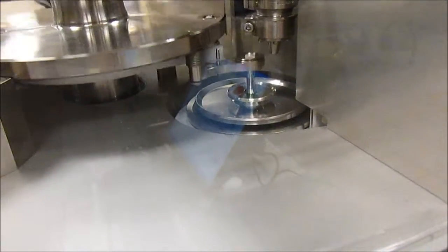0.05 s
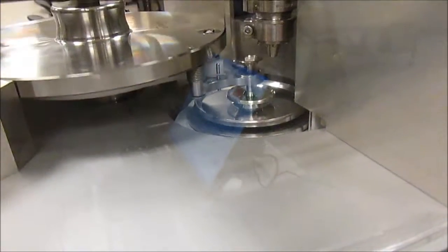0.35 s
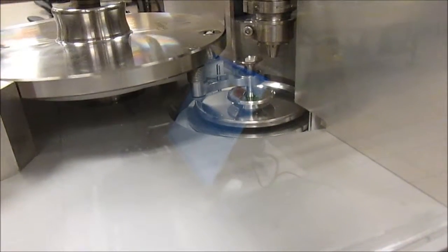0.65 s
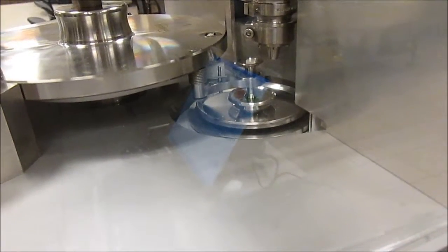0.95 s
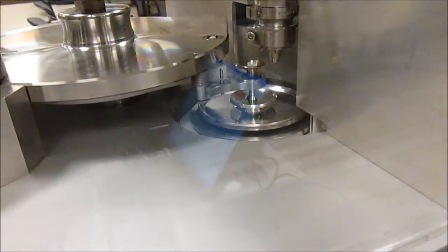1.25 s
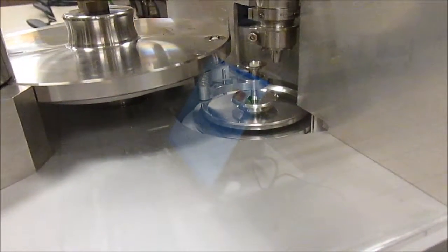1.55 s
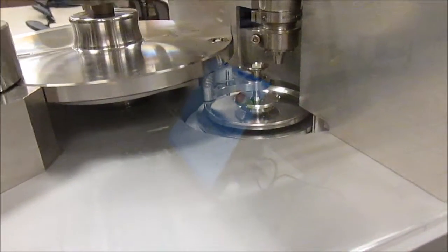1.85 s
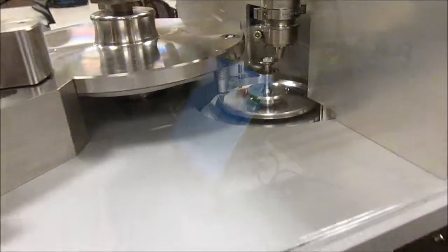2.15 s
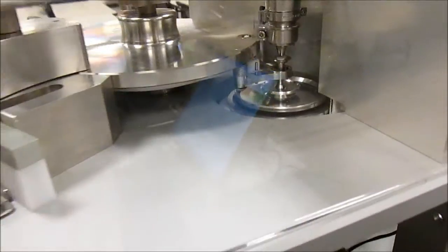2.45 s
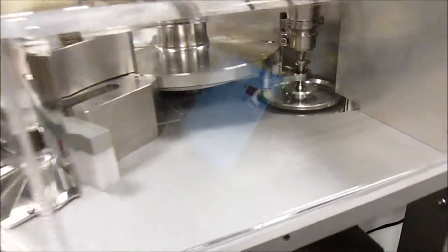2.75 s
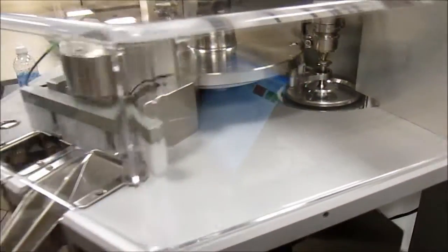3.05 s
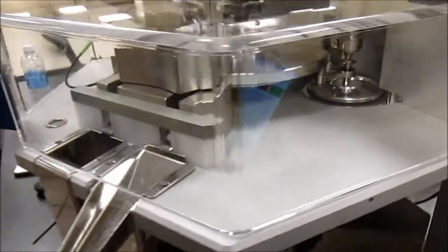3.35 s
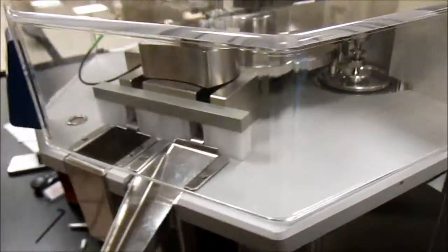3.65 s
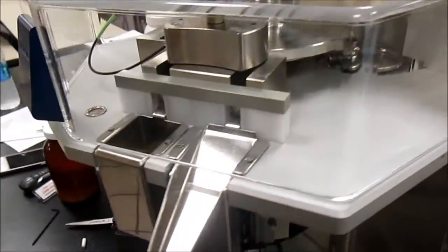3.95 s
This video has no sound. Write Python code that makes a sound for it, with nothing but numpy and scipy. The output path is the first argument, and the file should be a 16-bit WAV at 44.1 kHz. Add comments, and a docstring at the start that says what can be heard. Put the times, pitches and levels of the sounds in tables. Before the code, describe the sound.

Close to a packaging machine in a workroom, a pump drones and air rushes. The air stops, leaving the hum and several sharp metal clacks with short puffs, followed by a rapid, hissy pneumatic rattle.

```python
"""A vacuum pump hums and air hisses through a port, close to a capsule filling machine.
The air is shut off; the pump runs on, its housing ringing and knocking every turn.
Pneumatic slides rasp and clack against steel stops, then a valve fires twenty times a second
in a buzzing rattle. A gain control ducks the hum under every loud blow."""
import sys
import numpy as np
from scipy import signal
from scipy.fft import rfft, irfft
from scipy.io import wavfile

SR = 44100
rng = np.random.default_rng(int(sys.argv[2]) if len(sys.argv) > 2 else 0)


def wrap_up_sound(samples):
    """Save the sound to the file named by the first command line argument, as 16-bit audio."""
    columns = np.atleast_2d(samples).T
    # keep every value between -1 and 1, then stretch to whole-number steps
    tamed = np.clip(columns, -1, 1)
    steps = np.round(tamed * 32767).astype(np.int16)
    wavfile.write(sys.argv[1], SR, steps)


N = 176400
T = np.arange(N) / SR
AGE = np.arange(SR // 2) / SR   # time within one event, s
PUMP_HZ, STROKE_S = 28.17, 1.671   # turn rate, time of one stroke


def from_db(db):
    """Decibels to gain."""
    return 10 ** (np.asarray(db) / 20)


def rms_one(x):
    """Scale to unit power."""
    return x / np.sqrt(np.mean(x ** 2) + 1e-20)


def curve(rows, t=T):
    """Gain along a (s, dB) curve."""
    return from_db(np.interp(t, *np.transpose(rows)))


def pan(db):
    """Left gain up by db, right gain down."""
    return from_db(np.array([[db], [-db]]))


def drift(rate, t=T):
    """Unit Gaussian knots, `rate` per unit of t, joined by lines."""
    knots = rng.standard_normal(size=4000)
    return np.interp(t * rate, np.arange(len(knots)), knots)


def white(size=N):
    """Two independent white noises."""
    return rng.standard_normal((2, size))


def cyclic(period_s, share):
    """Noise with a share of its power repeating every period."""
    repeating = white(len(AGE))[:, (T % period_s * SR).astype(int)]
    return np.sqrt(share) * repeating + np.sqrt(1 - share) * white()


def burst(attack_s, hold_s, t60_s):
    """Envelope: rise, hold, exponential decay."""
    return np.clip(AGE / attack_s, 0, 1) * from_db(-60 * np.maximum(AGE - hold_s, 0) / t60_s)


def smooth(x, seconds):
    """One-pole lag."""
    r = np.exp(-1 / (seconds * SR))
    return signal.lfilter([1 - r], [1, -r], x)


def place(events):
    """Lay (s, sound) pairs on the stereo time line."""
    out = np.zeros((2, N + SR))
    for s, sound in events:
        out[:, int(s * SR):int(s * SR) + len(AGE)] += sound
    return out[:, :N]


def ring(times, hz, t60_s):
    """A damped mode struck at the given times."""
    clicks = np.full(N, 1e-18)
    times = np.asarray(times)
    clicks[(times[(times >= 0) & (times < T[-1])] * SR).astype(int)] = 1
    r, w = from_db(-60 / (t60_s * SR)), 2 * np.pi * hz / SR
    return signal.lfilter([0, np.sin(w)], [1, -2 * r * np.cos(w), r * r], clicks)


def colour(noise, spectrum, resonances=()):
    """Shape two noises by a spectrum, resonances and steel-wall reflections; stereo, rms 1."""
    # Stereo likeness. Each row: frequency in Hz, left-right correlation.
    likeness = [(100, 1), (400, 0.77), (1400, 0.65), (2800, 0.17), (5000, 0.62), (9000, 0.88),
                (15000, 0.78)]
    size, hz = noise.shape[1], np.linspace(1, SR / 2, 4410)

    def along(rows):
        knots_hz, values = np.transpose(rows)
        return np.interp(np.log(hz), np.log(knots_hz), values)

    power = 1 + sum((from_db(db) ** 2 - 1) / (1 + (2 * (hz - centre) / width) ** 2) ** 1.12
                    for centre, width, db in resonances)
    ripple_db = 2 * drift(1 / 44.66, hz) * hz / (hz + 500)   # reflections
    gain = from_db(along(spectrum) + ripple_db) * np.sqrt(np.abs(power))
    alike = along(likeness)
    mid_side_gain = gain * np.sqrt([1 + alike, 1 - alike])
    bins = np.linspace(0, len(hz) - 1, size // 2 + 1).astype(int)
    mid, side = irfft(rfft(noise) * mid_side_gain[:, bins], size)
    return rms_one(np.array([mid + side, mid - side]))


def noise_burst(db, envelope, spectrum, resonances=()):
    """One short event of coloured noise."""
    return from_db(db) * envelope * colour(white(len(AGE)), spectrum, resonances)


def housing_tone(levels_db):
    """A blow each turn rings the pump housing, the ring spread through the turn; rms 1."""
    orders, angle = np.arange(1, len(levels_db) + 1), np.linspace(0, 2 * np.pi, 4096)
    partials = from_db(levels_db)[:, None] * np.exp(1j * np.outer(orders, angle))
    # Minimum phase gives the sharpest attack.
    log_gain = np.log(from_db(np.interp(np.arange(257) / 4, orders, levels_db)))
    phases = rfft(2 * irfft(log_gain)[:256], 512).imag[4 * orders]
    # Even out the envelope, keeping the spectrum.
    flattened = np.exp(1j * np.angle(np.exp(1j * phases) @ partials))
    phases = np.angle(np.fft.fft(flattened)[orders])
    stereo_rad = 0.18 * rng.choice([-1, 1], len(orders)) * np.array([[1], [-1]])
    scatter_rad = 0.18 * rng.normal(size=len(orders))
    cycle = rms_one((np.exp(1j * (phases + scatter_rad + stereo_rad)) @ partials).real)
    turn = (T - STROKE_S + 0.002) * PUMP_HZ % 1   # the blow leads the stroke's peak
    return cycle[:, (turn * (len(angle) - 1)).astype(int)]


def pump():
    """Vacuum pump: hum, knocks and clatter recur every turn."""
    # Hum harmonics, from the first up. Each row: relative dB at the port, relative dB in front.
    harmonics = [(-27, -24), (-27, -29), (-10, -9.5), (-13, -11), (-21, -21), (-4.5, -5.5), (-11, -9.5),
                 (-16.5, -27), (1.5, 1), (-1.5, -6.5), (-13, -8.5), (-10, -7), (-22.5, -25), (-15.5, -13),
                 (-14, -12), (-22, -15.5), (-14, -13)]
    # Knocks. Each row: delay after the stroke in seconds, pitch in Hz, t60 in seconds, level in dB.
    knock_modes = [(.0215, 618, 0.06, -21.5), (.0092, 1200, 0.013, -26.5), (.014, 900, 0.097, -33.5),
                   (0.017, 1590, 0.016, -36)]
    # Clatter. Each row: frequency in Hz, relative density in dB.
    clatter_spectrum = [(300, -6.5), (450, -2), (800, -2.5), (1800, 0), (2300, -2), (2900, -12.5),
                        (6500, -15), (15000, -21.5)]
    # Whole pump. Each row: time in seconds, gain in dB.
    level = [(0, -8), (.15, 1.5), (1.1, 2), (1.2, -2), (2.1, 0.5), (2.8, -1.5), (3.3, -5.5), (4, -0.5)]
    port_db, front_db = np.transpose(harmonics)
    moved = np.interp(T, (2.37, 3.04), [0, 1])   # listening point moves from port to front
    hum_gain = from_db(-24 + 0.7 * drift(9))
    hum = hum_gain * ((1 - moved) * housing_tone(port_db) + moved * housing_tone(front_db))
    turn_s = 1 / PUMP_HZ
    strokes_s = np.arange(STROKE_S % turn_s - turn_s, T[-1], turn_s)
    knocks = sum(from_db(db) * ring(strokes_s + delay, hz, t60) for delay, hz, t60, db in knock_modes)
    clatter = from_db(-32.5) * colour(cyclic(turn_s, share=0.79), clatter_spectrum)
    return curve(level) * (hum * pan(-0.9) + knocks * pan(-2.5) + clatter)


def frame_rumble():
    """Low noise of the vibrating frame."""
    # Rumble. Each row: frequency in Hz, relative density in dB.
    spectrum = [(20, -5), (50, -24), (115, -3), (400, -8.5), (2000, -34)]
    # Each row: time in seconds, level in dB.
    level = [(.4, -30), (1.5, -39.5), (2.4, -39.5), (2.65, -31), (3.1, -42)]
    return curve(level) * colour(white(), spectrum)


def port_hiss():
    """Air rushes through a resonant port until shut off."""
    # Air flow. Each row: time in seconds, gain in dB.
    flow = [(0, -1), (1.09, 1), (1.15, -3), (1.3, -7.5), (1.4, -14), (1.54, -29), (2, -54.5)]
    # Hiss. Each row: frequency in Hz, relative density in dB.
    spectrum = [(100, -5.5), (600, -1), (2300, -3.5), (2900, -13), (5600, -6), (7500, -5.5), (7880, -17),
                (8250, -6), (10200, -1), (12800, -4.5), (15500, -0.5)]
    # Port resonances. Each row: centre in Hz, width in Hz, boost in dB.
    resonances = [(7260, 230, 6), (9330, 103, 14), (10870, 410, 13.5), (11110, 210, 12.5),
                  (12000, 130, 9.5), (14400, 420, 10.5)]
    return from_db(-19 + drift(60.3)) * curve(flow) * colour(white(), spectrum, resonances)


def cylinder_puffs():
    """Short puffs of air let into a resonant cylinder."""
    # Each row: start in seconds, level in dB.
    puffs = [(2.099, -27), (2.47, -30.5), (2.514, -33), (3.09, -19)]
    # Cylinder resonances. Each row: centre in Hz, width in Hz, boost in dB.
    resonances = [(4230, 490, 6.4), (8350, 790, 16), (11100, 1000, 13)]
    spectrum = [(1000, -1), (5000, -6), (15000, -13)]   # Hz, relative dB
    envelope = burst(0.02, 0.025, 0.1)
    return place((s, noise_burst(db, envelope, spectrum, resonances)) for s, db in puffs)


def seal_squeak():
    """A seal squeaks: a brief tone with jittering pitch."""
    # Each row: start in seconds, level in dB, hold in seconds, pitch in Hz.
    squeaks = [(1.37, -27, 0.028, 7250)]
    events = []
    for s, db, hold_s, hz in squeaks:
        phase = 2 * np.pi * np.cumsum(hz + 90 * drift(600, AGE)) / SR
        events.append((s, from_db(db) * burst(0.003, hold_s, 0.066) * np.sin(phase)))
    return place(events)


def stop_rings():
    """Some steel stops ring on unevenly after a blow."""
    # Each row: start in seconds, pitch in Hz, level in dB, t60 in seconds.
    modes = [(1.424, 4190, -39.5, .4), (1.829, 2360, -17.5, .07), (1.828, 7540, -17, .06)]
    return sum(from_db(db + 2 * drift(280)) * ring([s], hz, t60) for s, hz, db, t60 in modes)


def stop_clacks():
    """Blows on the stops: a brief chatter of steel on steel, with a faint tail."""
    # Each row: start in seconds, level in dB, contact in seconds, brightest Hz, t60 in seconds.
    blows = [(0.26, -17, 0.0018, 11000, 0.023), (1.288, -12, 0.0035, 9000, 0.048),
             (1.408, -25.5, .003, 11000, 0.028), (1.4225, -15, 0.0018, 5950, 0.01),
             (1.8202, -4.5, 0.0016, 13100, 0.04), (2.1639, 0, 0.0013, 5500, 0.027),
             (2.3122, -29.5, .002, 10000, 0.042), (2.424, -16, 0.0035, 7600, 0.05),
             (2.559, -19, 0.0045, 6900, 0.098), (3.152, -2, 0.0012, 7500, 0.026)]
    grid_hz, width_oct = np.geomspace(200, 16000, num=24), 0.5
    events = []
    for s, db, contact_s, hz, t60_s in blows:
        hump = from_db(-4) + np.exp(-0.5 * (np.log2(grid_hz / hz) / width_oct) ** 2)
        spectrum = np.column_stack([grid_hz, 20 * np.log10(hump)])
        chatter = burst(0.00022, contact_s, t60_s)
        click = 0.5 * burst(1 / SR, contact_s / 2, contact_s)
        tail = from_db(-21.5) * burst(0.0039, contact_s, 0.2)
        events.append((s, noise_burst(db, chatter + click + tail, spectrum)))
    return place(events)


def slide_rasps():
    """A pneumatic slide rasps on each stroke."""
    # Each row: start in seconds, level in dB, hold in seconds.
    strokes = [(2.134, -13, 0.016), (3.125, -14, 0.014)]
    # Rasp. Each row: frequency in Hz, relative density in dB.
    spectrum = [(300, -10), (850, -3.5), (3200, -2), (4300, -1), (6500, -11), (11000, -6.5), (15500, -22)]
    # Slide resonances. Each row: centre in Hz, width in Hz, boost in dB.
    resonances = [(890, 130, 7), (1870, 80, 10), (2450, 190, 5.2), (4260, 360, 3.6)]
    return place((s, noise_burst(db, burst(0.001, hold_s, 0.14), spectrum, resonances))
                 for s, db, hold_s in strokes)


def frame_thuds():
    """Heavy parts shake the frame."""
    # Each row: start in seconds, level in dB, spectral peak in Hz.
    thuds = [(0.126, -22.5, 271), (0.256, -27.5, 69.6), (2.562, -25.5, 395)]
    envelope = burst(0.0047, 0.0071, 0.18)
    return place((s, noise_burst(db, envelope, [(hz / 4, -20), (hz, 0), (hz * 10, -60)]))
                 for s, db, hz in thuds)


def valve():
    """Evenly timed, lengthening bursts sputter and ring in the valve body and the enclosure."""
    # Bursts, then the enclosure's slower answer. Each row: time in seconds, level in dB.
    jet_level = [(2.85, -2.5), (3.1, -4), (3.35, -8.5), (3.55, -6), (4, -2.5)]
    enclosure_level = [(2.85, -22.5), (3.3, -23), (3.8, -18)]
    # Their spectra. Each row: frequency in Hz, relative density in dB.
    jet_spectrum = [(1500, -24), (3500, -15.5), (5000, -10), (7000, -10.5), (8200, -5.5), (9500, 1),
                    (11200, -2.5), (13200, -1), (14000, -11), (15500, -3)]
    enclosure_spectrum = [(1000, -2), (3000, 0), (3550, -11), (4300, 0), (7000, 0), (15000, -7)]
    # Valve body resonances. Each row: centre in Hz, width in Hz, boost in dB.
    resonances = [(5550, 260, 8), (5830, 210, 7.8), (8650, 250, 9.1), (9060, 200, 7.9), (12430, 330, 9.5),
                  (13230, 220, 5.7)]
    start_s, period_s, sputter_db, sputters_per_s = 2.8525, 0.04999, 1.8, 500
    times = np.arange(start_s, T[-1], period_s)
    holds_s = np.linspace(0.0022, 0.0074, len(times))
    jet = colour(cyclic(period_s, share=0.5), jet_spectrum, resonances)
    low = signal.sosfiltfilt(signal.butter(2, 10500, fs=SR, output="sos"), jet)
    tilt = from_db(1.5 * drift(1 / period_s))   # brightness varies from burst to burst
    jet = low * tilt + (jet - low) / tilt
    jet_envelope = place((s, gain * burst(0.0016, hold_s, 0.075))
                         for s, gain, hold_s in zip(times, curve(jet_level, times), holds_s))
    enclosure_envelope = place((s, gain * burst(0.0052, 0.013, 0.105))
                               for s, gain in zip(times, curve(enclosure_level, times)))
    jet_envelope *= from_db(sputter_db * drift(sputters_per_s))
    enclosure_envelope *= from_db(sputter_db * drift(sputters_per_s))
    enclosure = colour(cyclic(period_s, share=0.5), enclosure_spectrum)
    return (jet_envelope * jet + enclosure_envelope * enclosure) * pan(0.53)


def scene():
    """All parts of the machine together."""
    background = pump() + frame_rumble()
    air = port_hiss() + cylinder_puffs() + seal_squeak()
    mechanism = stop_rings() + stop_clacks() + slide_rasps() + frame_thuds()
    return background + air + mechanism + valve()


def record(dry):
    """Gain control ducks fast and recovers slowly; soft clip and low-pass follow."""
    limit_db, release_db_per_s, cutoff_hz = -17.5, 15, 15800
    detect_s, attack_s, lookahead_s = 0.013, 0.0012, 0.0031
    level_db = 10 * np.log10(smooth(np.mean(dry ** 2, axis=0), detect_s) + 1e-12)
    over_db = np.maximum(level_db - limit_db, 0)
    held_db = np.maximum.accumulate(over_db + release_db_per_s * T) - release_db_per_s * T
    ducked = dry * from_db(-smooth(np.interp(T + lookahead_s, T, held_db), attack_s))
    return signal.sosfilt(signal.ellip(10, 0.2, 80, cutoff_hz, fs=SR, output="sos"), np.tanh(ducked))


dry = scene()
out = record(dry)
wrap_up_sound(out)
```